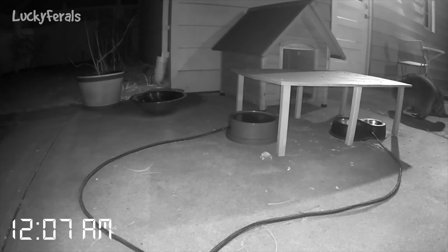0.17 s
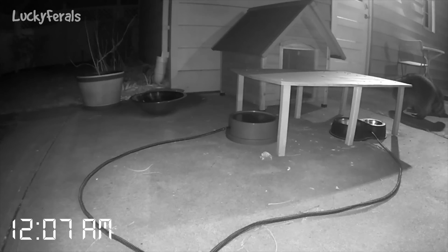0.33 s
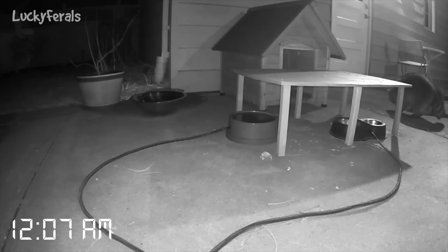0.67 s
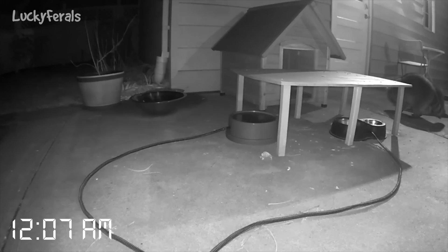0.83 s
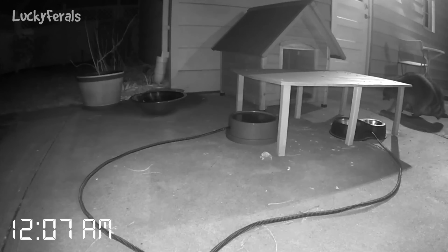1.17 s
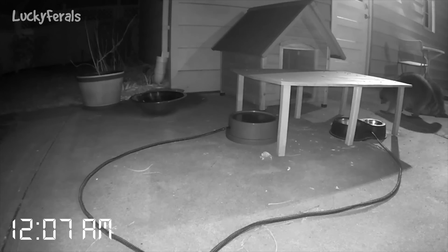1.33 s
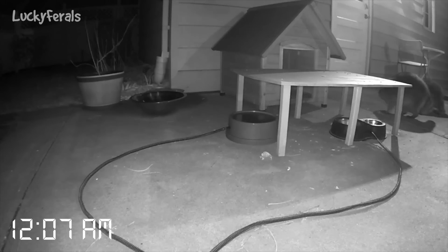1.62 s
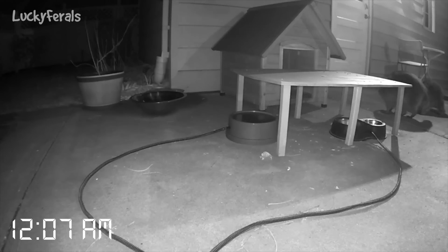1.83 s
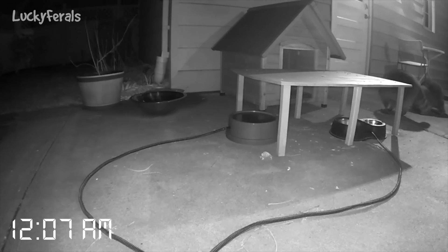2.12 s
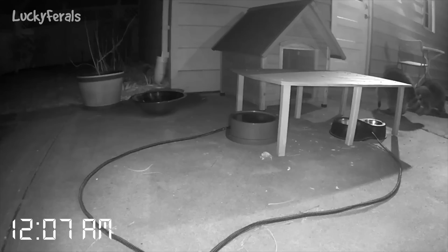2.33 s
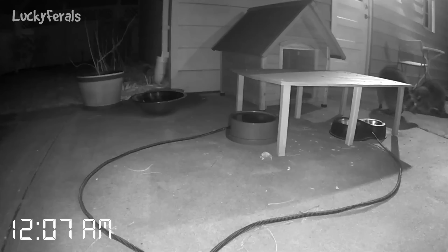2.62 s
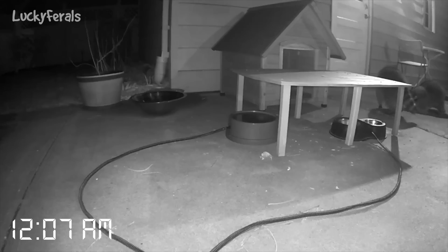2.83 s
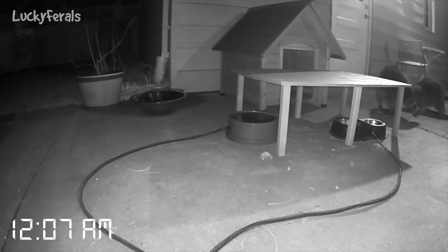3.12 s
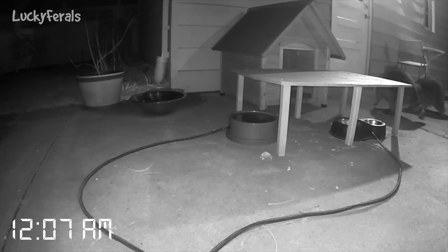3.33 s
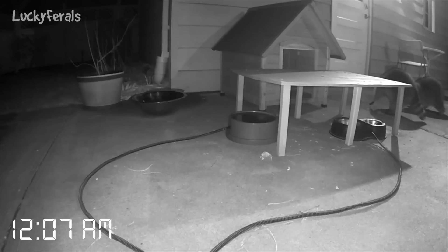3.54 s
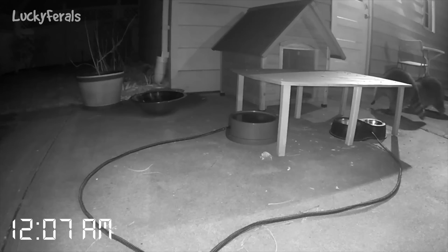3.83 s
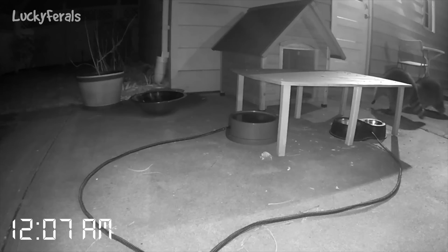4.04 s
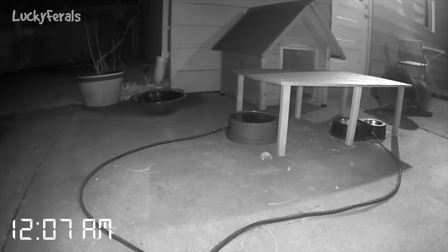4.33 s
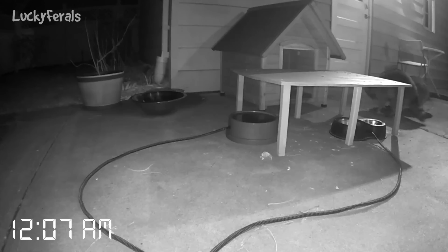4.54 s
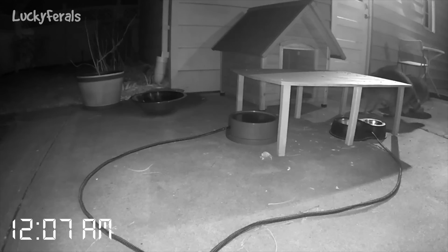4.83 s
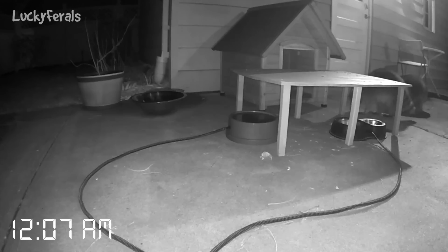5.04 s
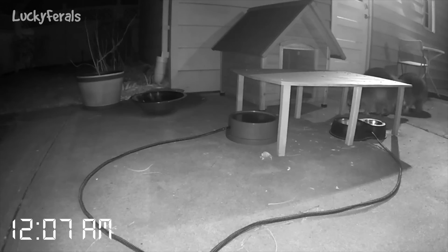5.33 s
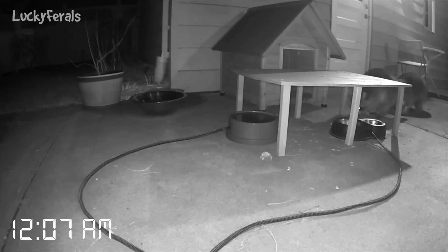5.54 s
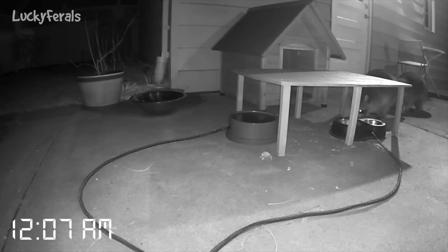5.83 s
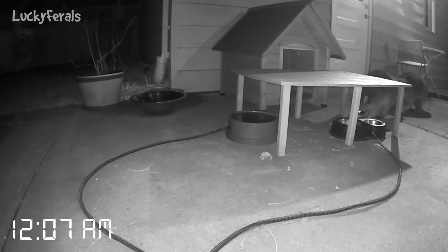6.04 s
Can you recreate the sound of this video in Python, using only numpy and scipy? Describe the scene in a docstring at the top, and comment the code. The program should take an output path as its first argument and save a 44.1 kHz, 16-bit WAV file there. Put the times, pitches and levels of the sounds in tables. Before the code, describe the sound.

Faint, distant traffic runs through all six seconds: a low rumble and soft tyre wash, with far engines wavering in pitch. From about 0.4 to 0.9 seconds a raccoon scolds in a quick burst of short, high, raspy chips. After a pause, a second burst of even shorter, tick-like chips runs from 2.4 to 3.1 seconds, ending with a soft huff through the nose. Around 4 seconds a few chips lead into a lower, rough, breathy snarl, which breaks up into rapid chips again from about 4.5 to 4.8 seconds. A last chip and a huff come near 4.9 seconds, trailing into a faint exhale, and one more quiet huff follows at 5.9. The calls stand clearly above the traffic, with short, tight reflections from the patio floor and house wall. The outdoor camera microphone cuts off the highest treble.

```python
"""Far traffic drones at night; a raccoon on a patio scolds in two bursts of short raspy chips,
then a snarl that breaks up into chips again, with a few huffs through the nose.
Each call is a squeak of the vocal folds plus breath, shaped by chest, throat, mouth and teeth.
Ground, house wall and a small roof throw the calls back. A narrow-band outdoor camera listens."""
import sys
import numpy as np
from scipy import signal
from scipy.fft import rfft, irfft, next_fast_len
from scipy.io import wavfile

SR = 44100
rng = np.random.default_rng(int(sys.argv[2]) if len(sys.argv) > 2 else 0)


def file_out(sig):
    """Save sig as 16-bit WAV at sys.argv[1]."""
    # one column per channel
    cols = np.atleast_2d(sig).T
    # limit, then scale
    lim = np.clip(cols, -1, 1)
    pcm = np.round(lim * 32767).astype(np.int16)
    wavfile.write(sys.argv[1], SR, pcm)


N = 272626

# Spectra of road rumble and tyre wash. Each row: frequency in Hz, relative level in dB.
RUMBLE_SPECTRUM = [(8.8, -52), (15, -6), (54, 1.5), (74, 1.5), (92, -4.5), (116, 0), (129, 0), (161, -6),
                   (233, -10), (300, -14.5), (381, -17.5), (416, -15), (520, -18.5), (680, -48.5),
                   (1140, -120)]
TYRE_SPECTRUM = [(310, -46), (520, -12.5), (590, -5.5), (631, -4), (692, -4), (821, -0.5), (986, -2.5),
                 (1310, -5.5), (1960, -11.5), (2190, -17), (3200, -26), (6560, -28), (7190, -32.5),
                 (7970, -52), (10400, -80), (17500, -120)]
# Swell of the far road. Each row: time in seconds, gain in dB.
ROAD_SWELL = [(0, -0.2), (.7, .8), (1.9, -1.9), (3.06, 0.5), (3.7, -3.5), (4.4, 2), (5.4, 2.4),
              (6.18, -0.5)]
# Far engines, one curve each. Each row: time in seconds, pitch in Hz, level in dB.
ENGINE_CURVES = [
    [(.5, 230.8, -57.5), (.95, 246.5, -61.5), (1.5, 238.4, -58), (2.3, 205.3, -64)],
    [(.6, 188.8, -74), (1.1, 187.3, -56.5), (1.8, 178.3, -72)],
    [(1.1, 130, -53), (1.7, 132.6, -52), (2.2, 141, -61), (3.3, 145.7, -56.5)],
    [(.7, 451.6, -72), (1.2, 431.5, -69), (1.7, 401, -65.5)],
    [(3.95, 174.6, -75), (4.3, 196, -54.5), (4.6, 214.4, -62.5), (5.2, 234.2, -59), (5.8, 248.5, -60)],
    [(5.4, 203.6, -64.5), (5.9, 210, -55), (6.18, 208.7, -57.5)],
    [(4.3, 449.3, -64.5), (4.8, 434, -62.5), (5.2, 445.4, -63.5), (5.5, 410.4, -68.5), (6.18, 424.6, -61.5)],
]
# Reflections off ground, wall and roof. Each row: delay in seconds, gain in dB.
ECHOES = [(.0056, -10.5), (.0085, -10), (0.0124, -13.5), (0.0146, -14.5), (.021, -17.5), (.031, -27)]
# Decay of the patio's tail. Each row: frequency in Hz, T60 in seconds.
PATIO_T60 = [(500, 0.28), (2000, 0.27), (4000, 0.32), (8000, 0.27)]
# Nose huffs. Each row: start in seconds, length in seconds, hiss level in dB, puff level in dB.
HUFFS = [(2.027, 0.012, -67.5, -79), (3.084, 0.064, -58, -56), (3.827, .07, -70.5, -73),
         (4.937, 0.084, -56.5, -56.5), (4.984, 0.29, -67, -80), (5.878, 0.066, -66.5, -67)]
# Spectra of a huff's hiss and low puff. Each row: frequency in Hz, relative level in dB.
HISS_SPECTRUM = [(1500, -5), (2200, 9), (3000, -4), (4100, 5.5), (5500, -2), (7300, -5), (8000, -31)]
PUFF_SPECTRUM = [(120, -17), (320, -2), (680, 21), (1000, -25), (1800, 11), (3000, -21)]
# Chest resonance. Each row: frequency in Hz, relative gain in dB.
CHEST_RESPONSE = [(380, -31), (560, 0), (660, 11.5), (800, -25), (1000, -13), (1400, -29)]
# Rasp colour per phrase, as head and lips move. Each row: frequency in Hz, relative gain in dB.
RASP_FIRST = [(1590, -49), (2700, -2.5), (2910, -2.5), (3460, -5), (3590, -11.5), (4190, 4), (4480, -7),
              (5690, -10), (6280, -23), (6980, -13.5), (7800, -30), (10100, -74), (17200, -120)]
RASP_SECOND = [(2500, -28), (3000, -42), (3400, -9), (3800, -11), (4250, 2), (4900, -5), (5600, 0),
               (6200, -15.5), (7000, -18.5), (7800, -32)]
RASP_SNARL = [(2300, -6), (2700, -11), (3000, 0), (3450, 2.5), (4200, -4), (4800, -2.5), (6200, -2),
              (7000, -8), (7800, -22)]
RASP_SQUEAL = [(2400, -41), (2900, -7), (3550, 4.5), (4100, -4.5), (4900, -19.5), (6300, -3.5), (7000, -3),
               (7800, -21.5)]
RASP_LAST = [(2300, -13), (2750, -3), (3150, -1), (3550, 2), (4200, -5.5), (5200, -1), (6000, 0),
             (6600, 4.5), (7300, -11), (7800, -20)]
# Order of the rasps. Each row: start in seconds, centre in Hz, colour table.
RASP_SCHEDULE = [(0, 3900, RASP_FIRST), (2, 4550, RASP_SECOND), (3.5, 4700, RASP_SNARL),
                 (4.29, 4200, RASP_SQUEAL), (4.405, 5500, RASP_LAST)]
# Through a burst the voice roughens and the lips draw back, then close. Each row: time in seconds,
# roughness (capped at 1), rasp and throat levels of an ordinary chip in dB re mouth.
TEMPER = [(.39, 0.46, -9, -8.5), (.44, 0.23, -6, -19.5), (.55, 0.73, 5, -26.5), (.6, 0.7, -2, -27),
          (.685, 0.7, -2.5, -19.5), (.735, 0.96, -14.5, -31.5), (.88, 0.9, -17, -20),
          (2.41, 0.18, -17, -9.5), (2.59, 0.54, -9.5, -16.5), (2.92, 0.39, -15, -13.5),
          (3.09, 0.38, -31, -22), (3.96, 0.93, -14.5, -14), (4.08, 1.06, -6.5, -14),
          (4.6, 0.81, -7.5, -17.5), (4.75, 0.61, -16, -30), (4.93, 0.18, -30, -23)]
# Short high chips. Each row: start in seconds, length in seconds, pitch in Hz, relative level in dB.
CHIPS = [(.388, 0.013, 870, -41.5), (0.413, 0.014, 1032, -31.5), (0.437, 0.028, 1111, -30.5),
         (0.486, 0.019, 950, -27), (0.514, 0.022, 960, -33.5), (0.56, 0.0069, 1057, -46),
         (0.597, 0.0088, 967, -29.5), (.642, 0.011, 969, -33), (0.682, 0.013, 988.5, -27.5),
         (0.732, 0.016, 1112, -33), (.782, .013, 979, -34.5), (0.881, 0.012, 1100, -57),
         (2.406, 0.0042, 867, -37), (2.42, .0044, 947, -31.5), (2.424, 0.012, 1106, -36.5),
         (2.467, 0.0041, 954, -41), (2.504, 0.01, 1015, -30), (2.539, 0.0096, 1000, -39.5),
         (2.585, 0.0051, 932, -31.5), (2.621, 0.0056, 987, -31.5), (2.66, 0.0079, 986, -32),
         (2.7, .0035, 1050, -53), (2.736, 0.0058, 965, -27.5), (2.814, 0.0036, 990, -45),
         (2.852, 0.0096, 1029, -39), (2.891, 0.01, 1006, -46.5), (2.93, 0.0066, 1019, -31.5),
         (3.087, 0.013, 1085, -38), (3.953, 0.019, 1000, -52.5), (4, .022, 978, -49),
         (4.0749, 0.013, 861, -28.5), (4.46, 0.014, 950, -41), (4.489, 0.0092, 943, -25.5),
         (4.531, 0.014, 908, -28.5), (4.572, 0.014, 975, -31.5), (4.617, 0.012, 940, -29),
         (4.657, 0.014, 1026, -38), (4.709, .0099, 1025, -42), (4.748, .009, 1045, -28.5),
         (4.932, .01, 1087, -35.5)]
# Low snarl notes. Each row: start in seconds, length in seconds, pitch in Hz, glide as a share of
# the pitch, roughness from 0 to 1, relative level in dB, rasp level in dB re mouth.
SNARL_NOTES = [(4.1082, 0.0084, 672, -0.033, 1, -21.5, -16), (4.116, 0.017, 681, 0, 0.67, -37.5, -0.5),
               (4.136, 0.035, 647, 0, 0.65, -29, -10), (4.169, 0.027, 646.4, 0.028, 0.7, -32.5, -8),
               (4.196, 0.023, 513.7, -.22, 0.4, -41, 0.5), (4.227, 0.024, 585, .14, .25, -41.5, -5),
               (4.252, .021, 635, .1, 0.2, -37, -9), (4.275, 0.02, 637, 0, 0.4, -46.5, 0),
               (4.309, 0.0304, 670, 0.17, 0.23, -31.5, -6), (4.352, .019, 593.4, -0.043, 0.19, -29, -7),
               (4.377, 0.038, 582, -0.04, 0.55, -42.5, -9), (4.417, 0.021, 563, -0.037, 0.58, -29.5, -12.5)]


def amp(db):
    """Decibels to gain."""
    return 10 ** (np.asarray(db) / 20)


def unit_rms(x):
    """Scales to rms 1."""
    return x / np.sqrt(np.mean(x ** 2) + 1e-20)


def lookup(points, hz):
    """Interpolates a table on a log-frequency axis."""
    f, value = np.transpose(points)
    return np.interp(np.log(hz + 1), np.log(f + 1), value)


def add(mix, start_s, sound):
    """Mixes a sound in at start_s."""
    part = mix[max(round(start_s * SR), 0):][:len(sound)]
    part += sound[:len(part)]


def shaped(x, gain):
    """Filters by gain(frequency); rms 1."""
    size = next_fast_len(len(x))
    spectrum = rfft(x, size) * gain(np.fft.rfftfreq(size, 1 / SR))
    return unit_rms(irfft(spectrum, size)[:len(x)])


def noise(spectrum, count):
    """Noise of a given spectrum; rms 1."""
    return shaped(rng.standard_normal(count), lambda f: amp(lookup(spectrum, f)))


def wander(rate_hz, count):
    """Smooth random drift up to about rate_hz."""
    return shaped(rng.standard_normal(count + 8192), lambda f: 1 / (1 + (f / rate_hz) ** 4))[:count]


def resonance(f, hz, width_hz, order=2):
    """Band-pass gain; a higher order has steeper skirts."""
    return (1 + ((f * f - hz * hz) / (width_hz * f + 1e-9)) ** 2) ** (-order / 2)


def road(rumble_db=-47.5, tyre_db=-55, steady_below_hz=170):
    """Far road: rumble that swells above its steady deepest part, plus tyre wash."""
    swell = amp(np.interp(np.arange(N) / SR, *np.transpose(ROAD_SWELL)))
    rumble = amp(rumble_db) * noise(RUMBLE_SPECTRUM, N)
    deep = signal.sosfiltfilt(signal.butter(2, steady_below_hz, fs=SR, output="sos"), rumble)
    return deep + swell * (rumble - deep) + amp(tyre_db) * noise(TYRE_SPECTRUM, N)


def engine(curve, waver=0.012, flicker_db=3):
    """A far engine glides in pitch; the air makes it waver."""
    times_s, hz, db = np.transpose(curve)
    t = np.arange(times_s[0], times_s[-1], 1 / SR)
    pitch_hz = np.interp(t, times_s, hz) * (1 + waver * wander(22, len(t)))
    level = amp(np.interp(t, times_s, db) + flicker_db * wander(10, len(t)))
    tone = np.sqrt(2) * np.sin(2 * np.pi * np.cumsum(pitch_hz) / SR)
    return level * signal.windows.tukey(len(t), 0.15) * tone


def patio(x, tail_db=-12, build_s=0.011):
    """Direct sound, a few hard reflections and a short scattered tail."""
    count = SR // 2
    hz, t, bins = signal.stft(rng.standard_normal(count), SR, nperseg=256)
    decay = amp(-60 * t / lookup(PATIO_T60, hz)[:, None])
    tail = signal.istft(bins * decay, SR, nperseg=256)[1][:count]
    tail *= 1 - np.exp(-np.arange(count) / SR / build_s)
    response = amp(tail_db) * tail / np.linalg.norm(tail)
    response[0] = 1
    for delay_s, db in ECHOES:
        add(response, delay_s * rng.uniform(0.96, 1.05), amp([db]))  # paths shift as the animal moves
    return signal.fftconvolve(x, response)


def huff(length_s, hiss_db, puff_db, fade_db=16, attack_s=0.0038):
    """Air through the nose: a low puff with hiss on top, quick to start, then fading."""
    t = np.arange(int(length_s * SR)) / SR
    envelope = unit_rms((1 - np.exp(-t / attack_s)) * amp(-fade_db * (t / length_s) ** 2))
    hiss = amp(hiss_db) * noise(HISS_SPECTRUM, len(t))
    puff = amp(puff_db) * noise(PUFF_SPECTRUM, len(t))
    return envelope * (hiss + puff)


def vocal_folds(contour_hz, rough, jitter=0.092, doubling=0.92):
    """Harmonic buzz and pulsed breath; rough folds jitter and alternate strong and weak beats."""
    count = len(contour_hz)
    cycles = np.cumsum(contour_hz * (1 + jitter * rough * wander(530, count))) / SR
    phases = rng.random(size=14)
    buzz = sum(np.cos(2 * np.pi * (k * cycles + phase)) for k, phase in enumerate(phases, 1))
    buzz *= 1 + doubling * rough * np.cos(np.pi * cycles)
    breath = (4.5 + np.cos(2 * np.pi * cycles)) * rng.standard_normal(count)
    return unit_rms(buzz), rough * unit_rms(breath)


def teeth_rasp(source, start_s, width_hz=5000, muzzle_db=3.5, muzzle_spacing_hz=1150):
    """Rasp at the teeth in the phrase's colour; the muzzle resonances shift with each syllable."""
    centre_hz, colour = [(hz, table) for from_s, hz, table in RASP_SCHEDULE if from_s <= start_s][-1]
    rasp = shaped(source, lambda f: resonance(f, centre_hz, width_hz) * amp(lookup(colour, f)))
    lips = rng.random()
    return shaped(rasp, lambda f: amp(muzzle_db * np.cos(2 * np.pi * (f / muzzle_spacing_hz + lips))))


def syllable(start_s, length_s, pitch_hz, glide, rough, level_db, *, mouth_hz, mouth_width_hz,
             throat_hz, throat_db, rasp_db, chest_db, arch, breathiness, crest_share,
             attack_s=0.00011, release_s=0.0036, rasp_release_s=0.0087,
             sag_db=7, flutter_db=5, flutter_hz=260):
    """One arched squeak of the folds, with breath, through chest, throat, mouth and teeth."""
    t = np.arange(4096) / SR
    rough = np.clip(rough, 0, 1)
    along = np.clip(2 * t / length_s - 1, -1, 1)
    contour_hz = pitch_hz * (1 + glide * along / 2 + arch * (1 / 3 - along ** 2))
    buzz, breath = vocal_folds(contour_hz, rough)

    inner = buzz + 0.71 * breath
    chest = shaped(inner, lambda f: amp(lookup(CHEST_RESPONSE, f)) * (f < CHEST_RESPONSE[-1][0]))
    throat = shaped(inner, lambda f: resonance(f, throat_hz, width_hz=640, order=3))
    mouth = shaped(buzz + breathiness * breath, lambda f: resonance(f, mouth_hz, mouth_width_hz, order=5))
    rasp = teeth_rasp(buzz + 1.9 * breathiness * breath, start_s)

    # Air flow starts at once, crests and is cut off; rough folds make it flutter.
    swell = amp(-sag_db * (along + 1 - 2 * crest_share) ** 2)
    past_end_s = np.maximum(t - length_s, 0)
    flow = (1 - np.exp(-t / attack_s)) * np.exp(-past_end_s / release_s) * swell
    flutter = amp(flutter_db * rough * np.tanh(wander(flutter_hz, len(t))))
    # The rasp needs pressure: it builds late and outlasts the voice.
    rasp_flow = (1 - np.exp(-t / (0.16 * length_s))) * np.exp(-past_end_s / rasp_release_s) * swell
    voice = (unit_rms(flow * mouth * flutter)
             + amp(throat_db) * unit_rms(flow * throat * flutter)
             + amp(rasp_db) * unit_rms(rasp_flow * rasp * flutter ** 0.31)
             + amp(chest_db) * unit_rms(flow * chest))
    return amp(level_db) * voice * np.sqrt(length_s * SR / len(t))


def chip(start_s, length_s, pitch_hz, level_db, ordinary_hz=1000, ordinary_db=-33):
    """A high chip, coloured by the burst's temper; the throat rings on the fundamental."""
    times_s, *controls = np.transpose(TEMPER)
    rough, rasp_db, throat_db = (np.interp(start_s, times_s, control) for control in controls)
    higher_hz = pitch_hz - ordinary_hz
    throat_db += 0.0611 * higher_hz
    rasp_db += 0.0425 * higher_hz - 0.28 * (level_db - ordinary_db)  # tight or weak chips rasp more
    glide = 0.13 * (1 - rough) ** 2
    return syllable(start_s, length_s, pitch_hz, glide, rough, level_db,
                    mouth_hz=1930 + 1.1 * higher_hz, mouth_width_hz=1300,
                    throat_hz=pitch_hz, throat_db=throat_db, rasp_db=rasp_db, chest_db=-29,
                    arch=0.043, breathiness=1, crest_share=0.47)


def snarl_note(start_s, length_s, pitch_hz, glide, rough, level_db, rasp_db,
               jaw_shut_s=4.245, opening_db_per_s=141.5, sink_hz_per_s=800):
    """A low, breathy note that rings the chest; the throat takes over as the jaw nearly shuts."""
    mouth_hz = 1950 - sink_hz_per_s * (start_s - SNARL_NOTES[0][0])
    throat_db = 11.5 - opening_db_per_s * abs(start_s + length_s / 2 - jaw_shut_s)
    return syllable(start_s, length_s, pitch_hz, glide, rough, level_db,
                    mouth_hz=mouth_hz, mouth_width_hz=1130,
                    throat_hz=2 * pitch_hz, throat_db=throat_db, rasp_db=rasp_db,
                    chest_db=-13 - 20 * rough, arch=0.15, breathiness=2.7, crest_share=0.49)


def scene(voice_db=-3):
    """Far traffic, then the raccoon's calls and huffs on the patio."""
    out = road()
    for curve in ENGINE_CURVES:
        add(out, curve[0][0], engine(curve))
    calls = [(row[0], chip(*row)) for row in CHIPS]
    calls += [(row[0], snarl_note(*row)) for row in SNARL_NOTES]
    for start_s, call in calls:
        add(out, start_s, amp(voice_db) * patio(call))
    for start_s, length_s, hiss_db, puff_db in HUFFS:
        add(out, start_s, patio(huff(length_s, hiss_db, puff_db)))
    return out[None]


def record(dry):
    """The camera's band limit."""
    edge_hz = 7950
    lowpass = signal.firwin(255, edge_hz, window=("kaiser", 8), fs=SR)
    return signal.oaconvolve(dry, lowpass[None], "same")


dry = scene()
out = record(dry)
file_out(out)
```